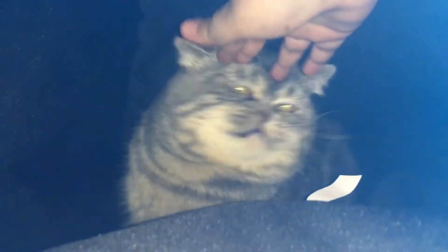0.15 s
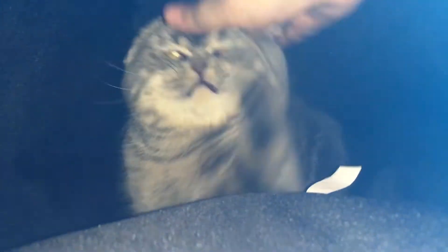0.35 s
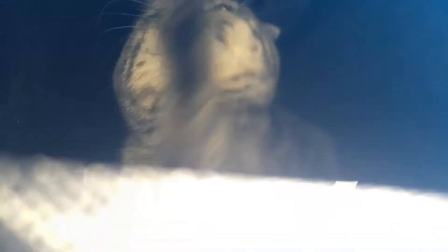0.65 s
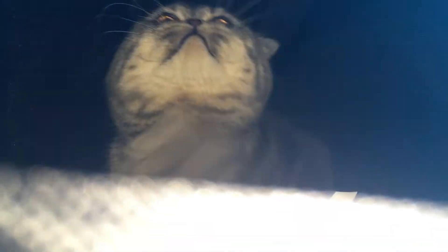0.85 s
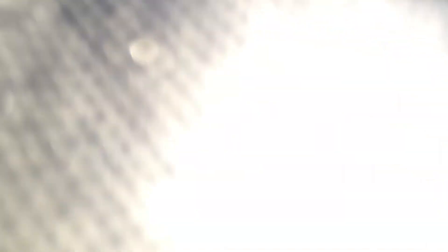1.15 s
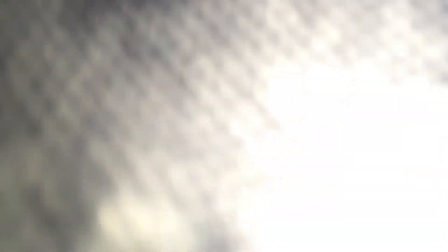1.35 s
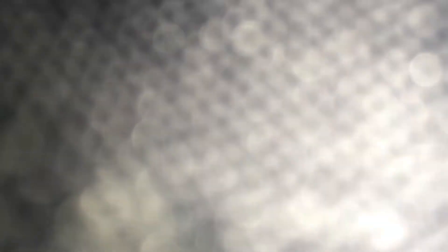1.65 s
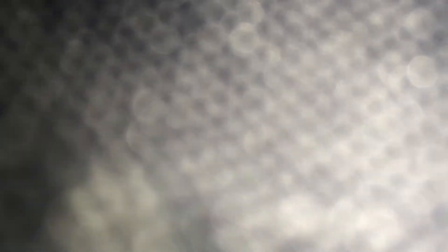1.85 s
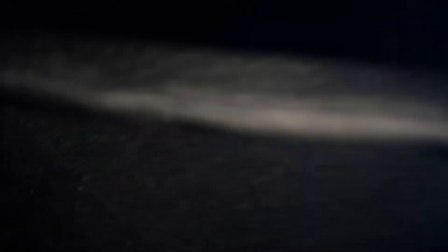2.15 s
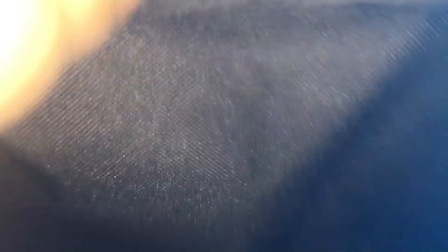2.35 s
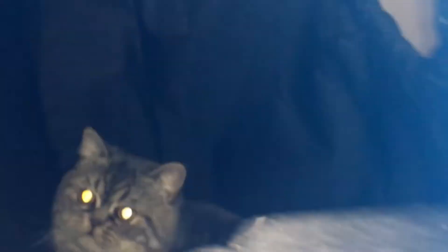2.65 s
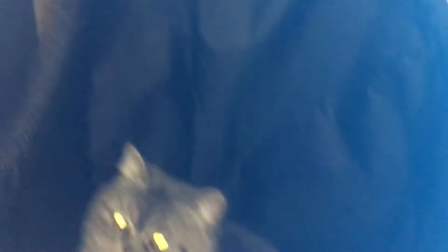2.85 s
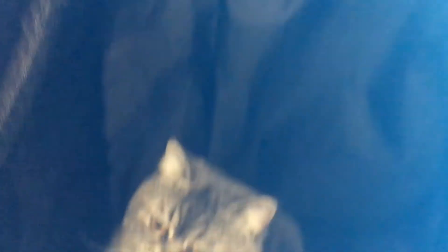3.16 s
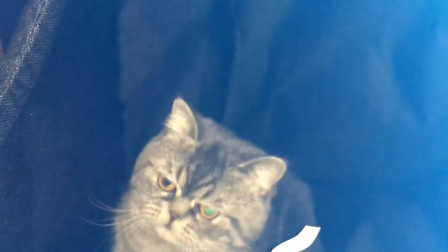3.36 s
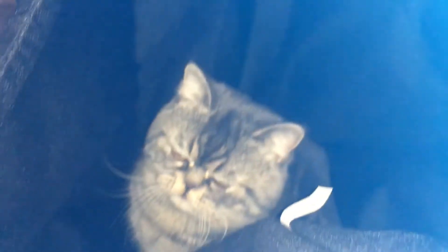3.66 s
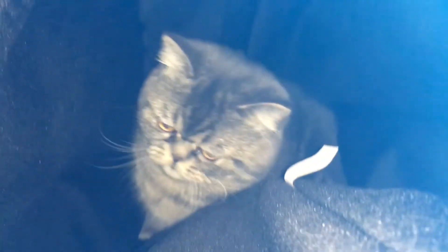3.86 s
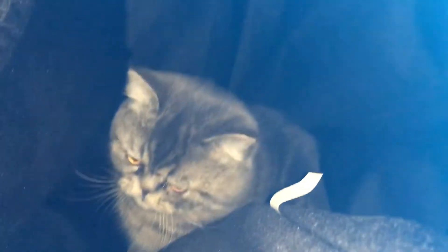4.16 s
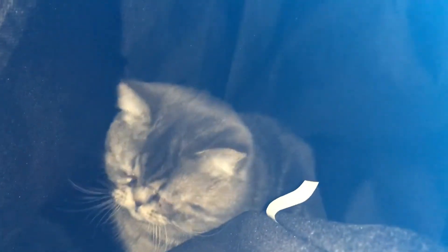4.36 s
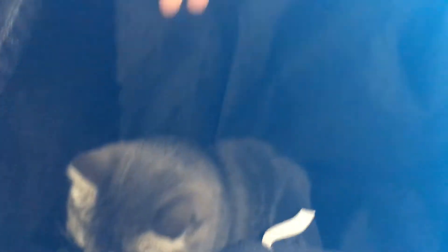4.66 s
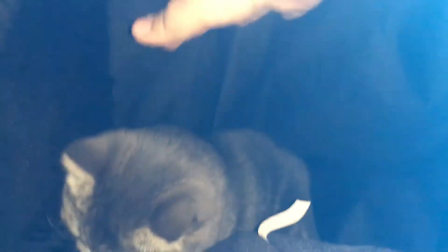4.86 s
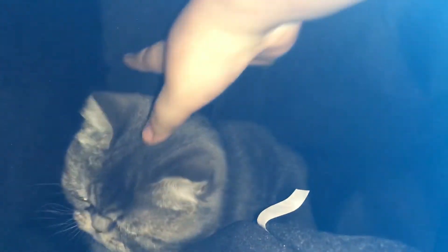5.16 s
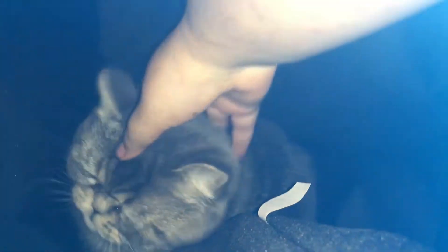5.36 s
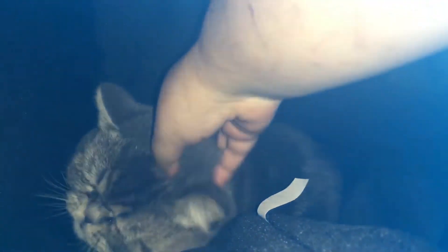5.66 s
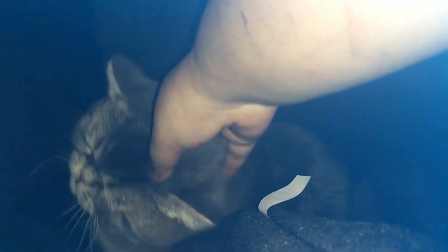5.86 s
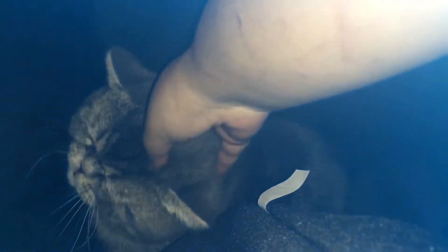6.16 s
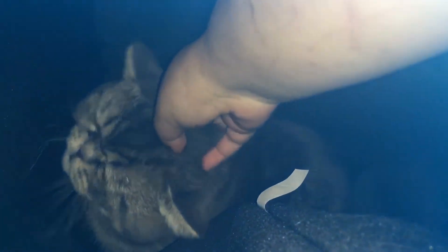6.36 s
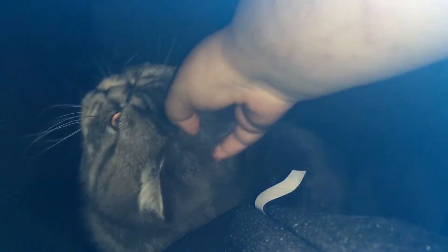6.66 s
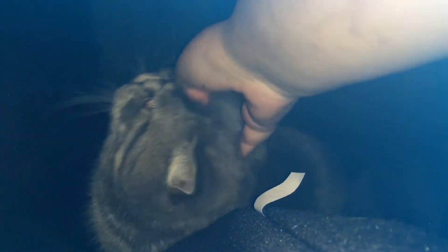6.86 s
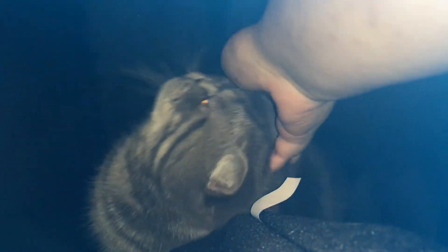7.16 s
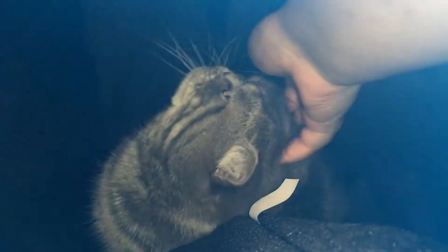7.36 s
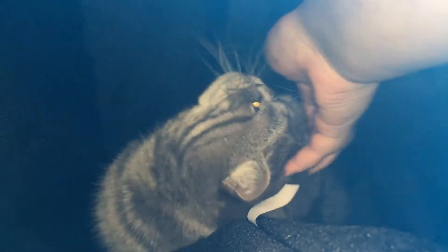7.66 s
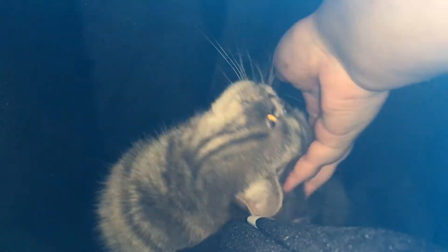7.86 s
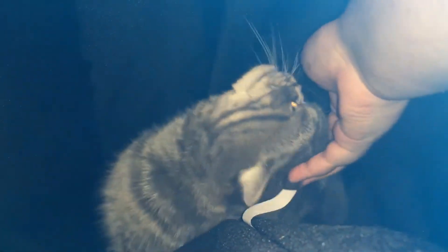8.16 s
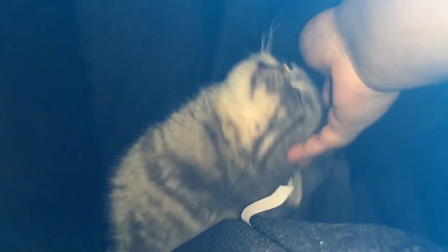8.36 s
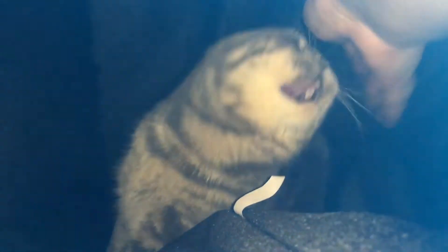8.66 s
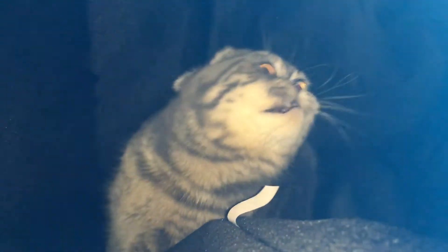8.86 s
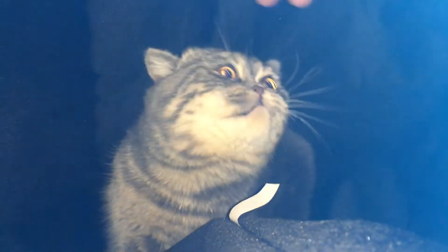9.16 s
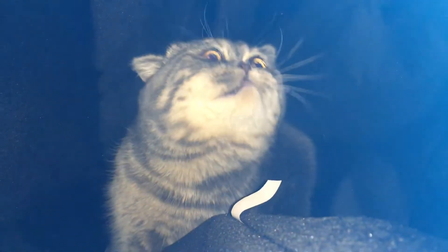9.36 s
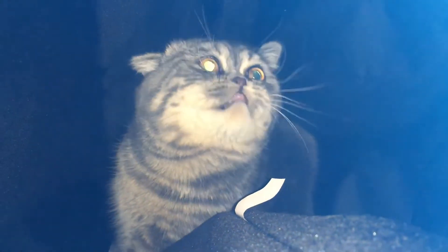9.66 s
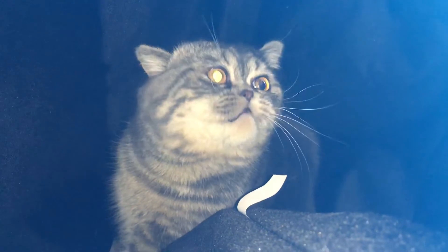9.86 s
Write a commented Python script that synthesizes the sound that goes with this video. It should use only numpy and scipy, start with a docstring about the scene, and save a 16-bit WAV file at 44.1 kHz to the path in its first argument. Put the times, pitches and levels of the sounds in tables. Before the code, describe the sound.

Muffled cloth rustle and thumps give way to clusters of hard, dry clacks on a plastic case in a quiet room.

```python
"""Phone in hand, cat under a blanket

Hand-held in a quiet room, the phone's own microphone close to everything that touches it. Gripping fingers stick
and slip on the plastic case: each slip is one jolt, spread into a sharp crack with a dull thud behind it. Sleeve,
blanket and fur rustle and bump at the microphone (shaped noise under moving levels), the phone lurches now and
then (sagging low sines), and the room stays behind: shaped air noise and narrow bands of hum."""
import sys
import numpy as np
from scipy import signal
from scipy.fft import rfft, irfft, next_fast_len
from scipy.io import wavfile
from scipy.ndimage import uniform_filter1d, map_coordinates

SR = 44100
rng = np.random.default_rng(int(sys.argv[2]) if len(sys.argv) > 2 else 0)


def master_out(mix):
    """Clip the mix to full scale and print it as 16-bit PCM to the path in sys.argv[1]."""
    frames = np.transpose(np.atleast_2d(mix))
    ceiling = np.clip(frames, -1, 1)
    pcm = np.round(ceiling * 32767).astype(np.int16)
    wavfile.write(sys.argv[1], SR, pcm)


N = 441000  # 10 s


def amp(db):
    """dB to gain."""
    return 10 ** (np.asarray(db) / 20)


def unit(x):
    """Scale to rms 1."""
    return x / np.sqrt(np.mean(x ** 2) + 1e-20)


def wobble(rate):
    """A smooth random curve with rate knots a second."""
    knots = rng.standard_normal(int(N * rate / SR) + 4)
    return map_coordinates(knots, [np.arange(N) * rate / SR])


def filtered(x, response):
    """Multiply the spectrum of x by a response of frequency."""
    size = next_fast_len(N + 8192)
    return irfft(rfft(x, size) * response(np.fft.rfftfreq(size, 1 / SR)), size)[:N]


def coloured(x, spectrum):
    """Shape x by (frequency, level) points joined on a log frequency axis, then scale to rms 1."""
    point_hz, point_db = np.transpose(spectrum)

    def response(hz):
        return amp(np.interp(np.log(hz + 1), np.log(point_hz), point_db))

    return unit(filtered(x, response))


# spectrum of the room's air: (frequency [Hz], relative density [dB])
AIR_SPECTRUM = [(25, -41), (65, -5.5), (110, -29), (145, -15.5), (330, -4), (430, -10.5), (1400, -12),
                (1750, -24), (4000, -24), (7300, -32), (8500, -28.5), (10200, -33.5), (15800, -37),
                (16300, -85)]
# hum standing in the room: (centre [Hz], level [dB], half width at half amplitude [Hz])
HUM_BANDS = [(146.8, -69.5, 6), (250, -65.5, 5.5), (317, -62.5, 1.6)]


def room():
    """Behind everything: nearly steady air noise, and hum as narrow noise bands that waver."""
    air_db = -56 + 0.27 * wobble(1)
    out = amp(air_db) * coloured(rng.standard_normal(N), AIR_SPECTRUM)
    for centre_hz, level_db, width_hz in HUM_BANDS:
        band = filtered(rng.standard_normal(N), lambda hz: 1 / (1 + ((hz - centre_hz) / width_hz) ** 2))
        out += amp(level_db) * unit(band)
    return out


# weak slips while the cloth moves: thud energy over its bumping, crack energy over its rubbing, full spread [dB]
SMALL_THUD_DB, SMALL_CRACK_DB, SMALL_SPREAD_DB = 28, 21.5, 9
SMALL_HZ, SMALL_TREBLE_DB = 390, -22  # middle thud pitch, mean treble over crack


def small_slips(count):
    """Scattered weak slips of skin on the case, stronger where the cloth moves more."""
    place, size, pitch, treble = rng.random((count, 4)).T
    s = (.01 + .98 * place) * N / SR
    bump_db, rub_db, _ = movement(s) + SMALL_SPREAD_DB * (size - .5)
    thud_hz = SMALL_HZ * 2 ** (pitch - .5)
    treble_db = SMALL_TREBLE_DB * (.5 + treble)
    return np.transpose([s, thud_hz, bump_db + SMALL_THUD_DB, rub_db + SMALL_CRACK_DB, treble_db])


# a slip that sets off more: (time of first slip [s], slips that follow, first gap [s], last gap [s],
# change by the last slip of thud [dB], crack [dB], treble over crack [dB])
SLIP_RUNS = [(3.4639, 15, 0.0087, 0.0023, -15, -21, -22), (4.0326, 3, 0.011, 0.01, -1, 3, 4),
             (5.2357, 7, .01405, .01395, 5, -1.5, 4), (5.866, 2, .0191, .0189, 5, -12, 1),
             (7.7579, 3, .0231, .0231, -1, -1, -2), (8.5384, 9, 0.006, 0.0044, -19, -14.5, -9),
             (8.6678, 6, 0.0071, 0.0058, -2, -9, 3)]
RUN_SCATTER_DB, RUN_JITTER = 1.5, .025  # jitter as a share of the last gap
RUN_BEND = 1.18  # above 1, a run changes most towards its end


def slip_runs(singles):
    """Stick-slip repeats: one slip sets off a run whose gaps and levels glide."""
    runs = []
    for start, count, first_gap, last_gap, *change_db in SLIP_RUNS:
        count = round(count)
        nearest = np.argmin(abs(singles[:, 0] - start))
        run = np.tile(singles[nearest], (count, 1))
        run[:, 0] += np.cumsum(np.geomspace(first_gap, last_gap, count))
        run[:, 0] += RUN_JITTER * last_gap * rng.standard_normal(count)
        progress = (np.arange(1, count + 1) / count) ** RUN_BEND
        run[:, 2:] += np.outer(progress, change_db) + RUN_SCATTER_DB * rng.standard_normal((count, 3))
        runs.append(run)
    return runs


# single slips of skin on the case: (time [s], thud pitch [Hz], thud energy [dB], crack energy [dB],
# treble over crack [dB])
SINGLE_SLIPS = [(.0094, 224, -9.5, -19.5, -32), (0.0942, 280, -20, -23, -35), (0.133, 400, -18, -37, -30),
                (.1638, 251, -11, -14, -21.5), (0.263, 227, -8.5, -23, -39), (0.299, 225, -10.5, -41, -30),
                (0.5294, 370, -13, -12, -30), (.6863, 390, -11, -22, -20), (1.8885, 236, -9.5, -17, -22),
                (1.9048, 118, 0, -12.5, -28), (1.932, 230, -22, -12.5, -30), (2.0033, 670, -19, -7.5, -35),
                (2.01, 590, -15, -9.5, -22), (2.06, 320, -30, -10.5, -22), (2.0886, 567, -10, -8.5, -37),
                (2.1062, 560, -5.5, -8, -33), (2.127, 534, -7, -23, -26), (2.3447, 213, -7.5, -19.5, -50),
                (2.401, 430, -9, -1, -28), (2.4722, 365, -4, -4, -14), (2.4889, 338, -1, -19, -10),
                (2.5235, 420, -27, -22, -9), (2.5578, 330, -26, -17, -10), (2.5911, 250, -4, -5.5, -29),
                (2.61, 476, -13, -15, -47), (2.706, 280, -6, -17.5, -33), (2.736, 560, 0.5, 4, -23),
                (2.7482, 356, -4, -5.5, -40), (2.761, 565, -1.5, -13, -33), (2.798, 564, -4, 0.5, -19),
                (2.8217, 383, 0, -1.5, -34), (2.833, 298, -10, -3.5, -38), (2.8651, 470, 4, -2, -13),
                (2.9176, 316, -12, -13, -38), (3.002, 245, -5.5, -17, -29), (3.1928, 574, -5, -2, -17),
                (3.1994, 523, -4.5, -1.5, -20), (3.2105, 590, -7, 0, -18), (3.2504, 530, 0, -10.5, -12),
                (3.263, 363, -3.5, -2, -30), (3.4624, 626, -3, 3.5, -14.5), (3.623, 520, -15, -13, -50),
                (3.6812, 527, -3.5, -13, -31), (3.697, 490, -10, -3.5, -13.5), (3.7448, 350, -13, -17, -16),
                (3.7687, 590, -8, 0.5, -20), (3.782, 300, -3.5, -3.5, -43), (3.818, 423, -8.5, -2.5, -19),
                (3.865, 233, -1, -16, -29), (3.897, 420, -13, -30, -25), (3.9921, 470, -17, -10, -14),
                (4.0089, 570, -13, -9, -38), (4.018, 412, -10, -4.5, -16), (4.0322, 397, -13.5, -12, -25),
                (4.1084, 326, -11, -24, -3), (4.1441, 333, 0.5, -5, -12.5), (4.178, 373, -7.5, -21, -17),
                (4.7509, 255, -7, -17, -31), (4.897, 410, -16.5, -23, -14), (4.9741, 476, -18, -21.5, -20),
                (5.2096, 370, -14, -28, -3), (5.223, 310, -17, -17, -8), (5.2361, 260, -7.5, -10, -2),
                (5.3545, 290, -16, -22.5, -2), (5.4078, 340, -15, -12.5, 1.5), (5.4792, 586, 2.5, 9, -23),
                (5.5001, 530, -1, 4.5, -27), (5.551, 350, -16, -13, 2), (5.5607, 372, -1, -7, 6),
                (5.5886, 280, -1, -1.5, 7.5), (5.6237, 350, 0, -3, 6.5), (5.678, 340, -37, -28, 2),
                (5.6976, 163, -10, -3.5, -31), (5.815, 340, -29, -23, 11), (5.8343, 395, 4.5, -1, 4.5),
                (5.866, 280, -40, -28, 12), (5.9209, 269, 7, -2.5, 9.5), (5.9695, 370, -10, -5, -12.5),
                (6.089, 360, -42, -29.5, -2), (6.414, 340, -34, -37, 11), (6.8131, 550, -18.5, -27, -9),
                (6.996, 450, -18.5, -34, -10), (7.0271, 410, -13, -20.5, -11), (7.0578, 463, -14, -27, -8),
                (7.0991, 564, -14, -24.5, -11), (7.1253, 390, -15.5, -34, -11),
                (7.1446, 378, -17.5, -29, -14), (7.1822, 550, -21, -9.5, -40), (7.1853, 258, -7, -13, -44),
                (7.4043, 477, -14, -25, -9), (7.5747, 253, -3, 1, 6), (7.6491, 310, 1, 3, 0.5),
                (7.6861, 290, -0.5, -0.5, 2), (7.7315, 326, 0.5, 0.5, 2.5), (7.758, 312, -0.5, 1.5, 2),
                (7.79, 180, -14, -22, 7), (7.858, 453, -2, 2.5, 0), (7.867, 280, -23, -21.5, 10),
                (8.1199, 375, -1.5, 1.5, 0), (8.1976, 370, -1, -.5, 3), (8.3965, 430, -4.5, -4.5, -1),
                (8.5384, 360, -3, -2.5, 4.5), (8.6575, 510, -10, -15, -13), (8.6678, 467, -8, -10.5, -13),
                (8.8106, 450, -14, -16.5, -4), (8.913, 268, -14, -31, -20), (8.942, 261, -17, -46, -20)]
# each new grip damps the middle range differently: (from time [s], middle range level [dB])
GRIP_CHANGES = [(0, 17.5), (2.3, 15), (2.78, 7.5), (3.95, -2), (4.6, -10), (5.1, -20), (5.4, -10.5),
                (5.65, -4.5), (6.7, -6), (8.6, 5)]
SNAP_SHARE = 0.84  # the middle range follows this part of the treble


def all_slips():
    """Every slip as (time [s], thud [Hz], energies of thud, knock, snap and tick [dB])."""
    singles = np.array(SINGLE_SLIPS, float)
    rows = [singles] + slip_runs(singles) + [small_slips(count=140)]
    s, thud_hz, thud_db, crack_db, treble_db = np.vstack(rows).T
    since, grip_db = np.transpose(GRIP_CHANGES)
    grip_db = grip_db[np.clip(np.searchsorted(since, s) - 1, 0, None)]
    snap_db = crack_db + SNAP_SHARE * treble_db + grip_db
    return np.transpose([s, thud_hz, thud_db, crack_db, snap_db, crack_db + treble_db])


# the ranges that carry knock, snap and tick of a slip: (centre [Hz], width [octaves])
CRACK_RANGES = [(1700, 0.98), (5000, 0.55), (11500, 0.81)]
# resonances of case and microphone port that colour every slip: (centre [Hz], half width [Hz], peak gain [dB])
CASE_RESONANCES = [(1210, 1330, 14.5), (2220, 190, 3), (3300, 940, 8.5), (6140, 1000, 10), (8320, 760, 6.5),
                   (11970, 1500, 7.5)]
SLIP_SIZE, LEAD = 2048, 256  # samples: one slip, and the part kept ahead of it


def jolts(slips):
    """Bending waves in the case spread each jolt: treble arrives first, the thud last with a falling pitch."""
    hz = np.fft.rfftfreq(SLIP_SIZE, 1 / SR)[None] + 1

    def hump(centre_hz, octaves):
        return np.exp(-.5 * (np.log2(hz / centre_hz) / octaves) ** 2)

    thud_hz = slips[:, 1:2]
    thud = hump(thud_hz, octaves=0.54) + 0.66 * hump(thud_hz / 2, octaves=1.0)
    humps = [thud] + [hump(*crack_range) for crack_range in CRACK_RANGES]
    colour = amp(sum(db / (1 + ((hz - c) / w) ** 2) for c, w, db in CASE_RESONANCES))
    power = 0
    for column, shape in enumerate(humps, start=2):
        shape = shape * colour
        norm = np.sqrt(np.sum(shape ** 2, axis=1, keepdims=True) * 2 / SLIP_SIZE)
        power = power + (amp(slips[:, column, None]) * shape / norm) ** 2
    slope, delay_s = .9, 0.001017  # delay at 1 kHz; it grows as frequency ** -slope
    turns = LEAD / SR * hz + delay_s * 1000 * ((hz / 1000) ** (1 - slope) - 1) / (1 - slope)
    return irfft(np.sqrt(power) * np.exp(-2j * np.pi * (turns + 0.36)), SLIP_SIZE)


def reflections(jolt, times):
    """Case edges return the jolt within a millisecond, over a longer weak tail; the blanket adds a dull wake."""
    t = np.arange(SLIP_SIZE) / SR
    edges = np.diff(rng.standard_normal(jolt.shape) * amp(-6.5 - 60 * t / 0.00097), prepend=0)
    edges += rng.standard_normal(jolt.shape) * amp(-23.5 - 60 * t / 0.012)
    grip = np.searchsorted(np.transpose(GRIP_CHANGES)[0], times)
    edges = .85 * edges[grip] + .45 * edges  # mostly alike within a grip
    blanket = uniform_filter1d(rng.standard_normal(jolt.shape), size=3) * amp(-36 - 60 * t / .025)
    return signal.fftconvolve(jolt, edges + blanket, axes=1)[:, :SLIP_SIZE]


def case():
    """Skin sticks and slips on the plastic case: each slip is a jolt and its reflections."""
    slips = all_slips()
    jolt = jolts(slips)
    waves = jolt + reflections(jolt, slips[:, 0])
    # reflections leave the energy of each slip unchanged
    waves *= np.linalg.norm(jolt, axis=1, keepdims=True) / np.linalg.norm(waves, axis=1, keepdims=True)
    # a faint dulled copy 3 ms ahead of each crack
    dulled = uniform_filter1d(uniform_filter1d(waves, size=4), size=3) - uniform_filter1d(waves, size=15)
    waves += amp(-21) * np.roll(dulled, -round(.003 * SR), axis=1)
    at = np.round(slips[:, :1] * SR).astype(int) + np.arange(SLIP_SIZE) - LEAD
    return np.bincount(at.ravel(), waves.ravel(), N + SR)[:N]


# movements of cloth past the phone, each a list of (time [s], bumping level [dB], fibre hiss level [dB])
CLOTH_MOVES = [
    [(.03, -52, -63), (.13, -45.5, -67), (.269, -49.5, -62.5), (.404, -43.5, -50), (.51, -40, -48),
     (.673, -44.5, -50), (.76, -55, -57.5)],
    [(.872, -33.5, -52), (.9, -40.5, -39.5), (.948, -34.5, -36.5), (1.048, -35.5, -53.5),
     (1.127, -33.5, -42.5), (1.187, -35.5, -57), (1.277, -40, -49), (1.39, -47, -57)],
    [(1.47, -36.5, -55.5), (1.522, -32, -51.5), (1.62, -55, -62), (1.716, -55.5, -53.5), (1.81, -52, -57)],
    [(1.865, -41.5, -53), (1.916, -40.5, -49), (1.99, -39, -48), (2.07, -41.5, -60), (2.13, -49, -51),
     (2.2, -54.5, -73)],
    [(2.31, -47, -63), (2.355, -43, -63), (2.424, -37, -53), (2.534, -42.5, -47), (2.574, -41.5, -62),
     (2.634, -43, -52), (2.68, -45, -46), (2.819, -38.5, -48.5), (2.908, -45, -49)],
    [(2.94, -46, -45.5), (3.03, -46.5, -51), (3.083, -41.5, -38.5), (3.243, -43, -49.5), (3.3, -56, -54)],
    [(3.472, -65, -64), (3.57, -48, -53.5)],
    [(3.625, -47.5, -56), (3.786, -47, -49.5), (3.901, -52, -63), (3.931, -55, -68), (4.096, -41.5, -56),
     (4.2, -49, -72)],
    [(4.33, -54, -60.5), (4.55, -58, -62.5), (4.679, -46, -54), (4.799, -59, -52.5), (4.919, -52.5, -57.5),
     (4.969, -52, -60), (5.213, -51.5, -56), (5.34, -49, -57)],
    [(5.39, -63, -55), (5.488, -41.5, -53), (5.547, -50, -60), (5.597, -62, -58), (5.752, -62, -63),
     (5.782, -85, -60), (5.932, -60, -62), (5.98, -52, -67)],
    [(6.33, -79, -63), (6.425, -90, -57), (6.62, -82, -64.5)],
    [(7.0, -61, -77), (7.209, -65, -76), (7.45, -62.5, -75)],
    [(8.2, -71, -81), (8.4, -69, -60), (8.466, -44, -53.5), (8.635, -55, -54), (8.665, -58, -37),
     (8.705, -38.5, -39), (8.84, -51.5, -48.5), (8.88, -61, -45.5), (8.935, -47, -54)],
    [(8.97, -65, -62), (9.45, -62.5, -65), (9.9, -59, -67)],
]
# levels while nothing moves: bumping [dB], fibre hiss [dB]
STILL_LEVELS = [-87, -73]
RISE_S, FALL_S, FADE_DB = .02, .035, 20  # a movement starts and stops abruptly: FADE_DB in each such time
RUB_SHARE, RUB_DB = 0.61, -3.5  # rubbing lies between hiss (0) and bumping (1), plus this offset


def movement(t):
    """Cloth levels in dB of bumping, rubbing and hiss at the times t; the strongest movement counts."""
    gain = np.outer(amp(STILL_LEVELS), np.ones(len(t)))
    for move in CLOTH_MOVES:
        s, *levels = np.transpose(move)
        before = np.clip((s[0] - t) / RISE_S, 0, 3)
        after = np.clip((t - s[-1]) / FALL_S, 0, 3)
        fade_db = FADE_DB * (before + after)
        gain = np.maximum(gain, amp([np.interp(t, s, level_db) - fade_db for level_db in levels]))
    bump_db, hiss_db = 20 * np.log10(gain)
    rub_db = RUB_SHARE * bump_db + (1 - RUB_SHARE) * hiss_db + RUB_DB
    return np.array([bump_db, rub_db, hiss_db])


def fibres(rate, spread_db, share):
    """Noise in which tiny catches of fibre on fibre, rate a second, hold a share of the power."""
    caught = rng.random(N) < rate / SR
    catches = caught * amp(spread_db * rng.exponential(size=N)) * rng.standard_normal(N)
    return np.sqrt(1 - share) * rng.standard_normal(N) + np.sqrt(share) * unit(catches)


def patchy(x, depth_db):
    """Different fibres catch at different pitches: patches of random gain in time and frequency."""
    z = signal.stft(x, nperseg=256)[2]
    field = uniform_filter1d(rng.standard_normal(z.shape), size=10, axis=0)
    field = uniform_filter1d(field, size=8, axis=1)
    return unit(signal.istft(z * amp(depth_db * unit(field)), nperseg=256)[1][:N])


# spectrum of cloth bumping the microphone: (frequency [Hz], relative density [dB])
BUMP_SPECTRUM = [(15, -62), (25, -4.5), (86, -6.5), (151, -1), (239, -3), (279, -5), (700, -16.5),
                 (910, -45.5), (1540, -120)]
# spectrum of cloth rubbing: (frequency [Hz], relative density [dB])
RUB_SPECTRUM = [(210, -55.5), (350, -24.5), (665, -1.5), (1120, -7), (1980, -8), (3040, -15), (4000, -24),
                (5200, -24), (8800, -120)]
# spectrum of fibre hiss: (frequency [Hz], relative density [dB])
FIBRE_SPECTRUM = [(1180, -41.5), (2000, -9), (2430, -6), (2960, -7), (4420, -4.5), (5000, -5.5),
                  (6030, -4.5), (7740, -14.5), (8620, -9.5), (10200, -16), (14800, -14.5), (16200, -31),
                  (16800, -78)]
# a fingertip dragging for a moment: (time [s], length [s], rubbing level [dB], fibre hiss level [dB])
FINGER_DRAGS = [(2.273, 0.03, -54, -37.5), (2.396, 0.052, -51, -44), (2.4695, .013, -35.5, -21),
                (2.4824, 0.023, -33.5, -27), (2.548, 0.059, -47, -42), (2.831, 0.0063, -17.5, -54),
                (3.178, .013, -37, -55), (4.734, 0.068, -47, -81), (8.569, 0.04, -51, -70),
                (8.653, 0.018, -41, -53)]


def cloth():
    """At the microphone: movements bump the phone in lumps and drag fibres past; fingertips drag too."""
    t = np.arange(N) / SR
    gain = amp(movement(t))
    for start, length, *drag_db in FINGER_DRAGS:
        u = (t - start) / length
        stroke = np.clip(np.minimum(12 * u, 3 * (1 - u)), 0, 1)  # quick start, slower end
        gain[1:] += np.outer(amp(drag_db), stroke)
    jerk, lump = wobble(35), wobble(24)
    bump = coloured(rng.standard_normal(N), BUMP_SPECTRUM)
    bump = unit(amp(0.98 * lump + 2.2 * jerk) * bump)
    rub = patchy(fibres(rate=600, spread_db=2.5, share=.45), depth_db=3)
    rub = unit(amp(1.3 * jerk + .8 * lump) * coloured(rub, RUB_SPECTRUM))
    hiss = patchy(fibres(rate=2500, spread_db=2, share=.3), depth_db=3)
    hiss = unit(amp(1.3 * jerk + 1.2 * wobble(300)) * coloured(hiss, FIBRE_SPECTRUM))
    return np.sum(gain * [bump, rub, hiss], axis=0)


# the whole phone lurches in the hand: (time [s], nominal pitch [Hz], level before rise and decay [dB],
# time to decay 60 dB [s])
PHONE_LURCHES = [(0.478, 128, -21, 0.071), (0.956, 134, -19.5, 0.063), (1.113, 182, -14, 0.12),
                 (1.492, 155, -20.5, 0.077), (1.522, 153, -17.5, 0.12), (5.699, 121, -31, 0.043),
                 (5.749, 130, -26, 0.031), (5.836, 122, -24, 0.041), (5.922, 92, -7.5, 0.032),
                 (7.186, 142, -31, 0.11), (9.69, 160, -41.5, 0.061)]


def lurches():
    """The phone swings in the hand: a soft low sine whose pitch sags as it dies."""
    out, t = np.zeros(N + SR), np.arange(SR // 4) / SR
    for start, hz, level_db, t60 in PHONE_LURCHES:
        cycles = hz * t
        level = amp(level_db - 60 * t / t60) * (1 - np.exp(-cycles / 0.21))
        out[round(start * SR):][:len(t)] += level * np.sin(2 * np.pi * cycles ** 0.93)
    return out[:N]


def scene():
    """Everything reaches one microphone."""
    return (room() + case() + cloth() + lurches())[None]


TOP_HZ = 17100  # nothing passes above


def record(dry):
    """The input stage rounds off the sharpest cracks; deepest bass and the top of the band are cut."""
    rounded = dry[0] / (1 + np.abs(dry[0] / .88) ** 4) ** (1 / 4)

    def response(hz):
        top = np.sin(np.pi / 2 * np.clip((TOP_HZ - hz) / 900, 0, 1)) ** 2
        bass = hz ** 4 / (hz ** 4 + 45 ** 4)  # half amplitude at 45 Hz
        return top * bass

    return filtered(rounded, response)[None]


dry = scene()
out = record(dry)
master_out(out)
```